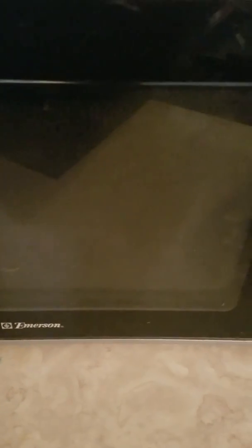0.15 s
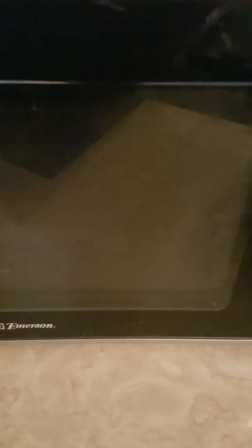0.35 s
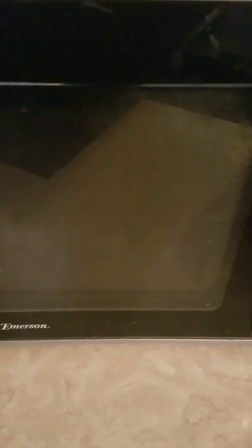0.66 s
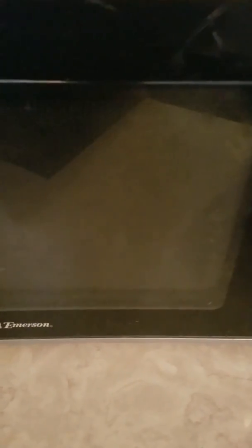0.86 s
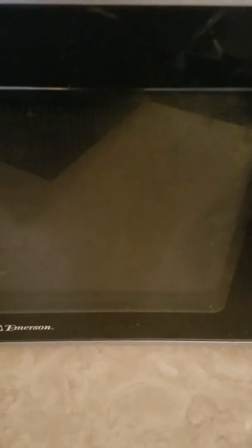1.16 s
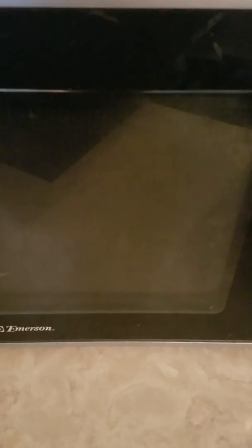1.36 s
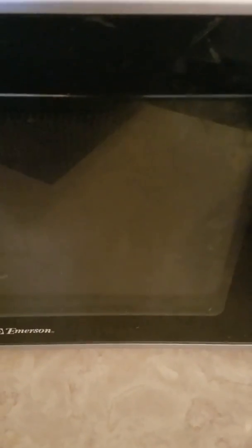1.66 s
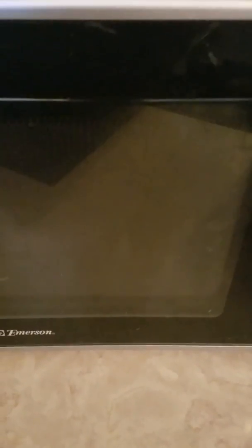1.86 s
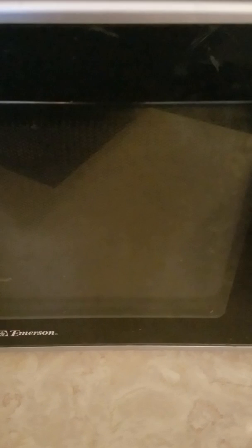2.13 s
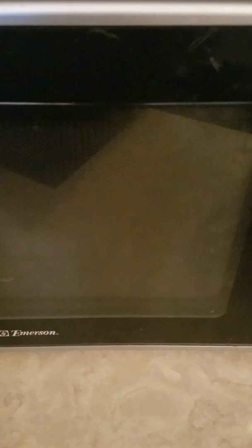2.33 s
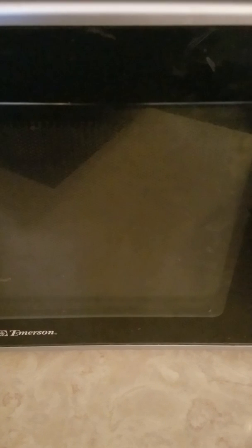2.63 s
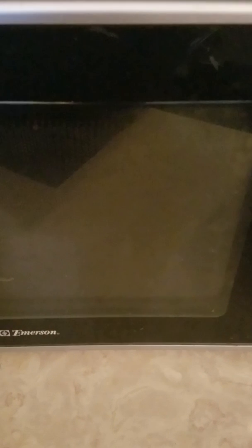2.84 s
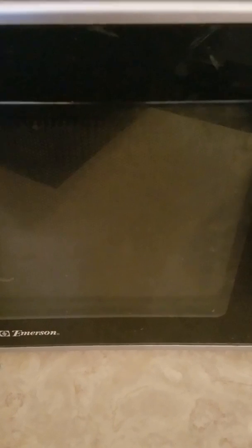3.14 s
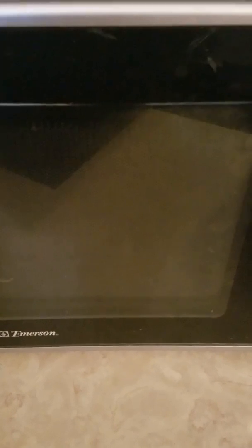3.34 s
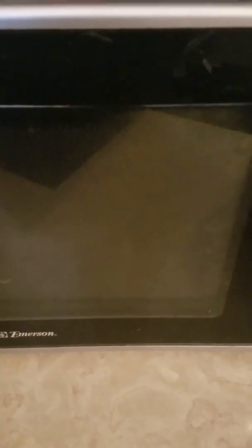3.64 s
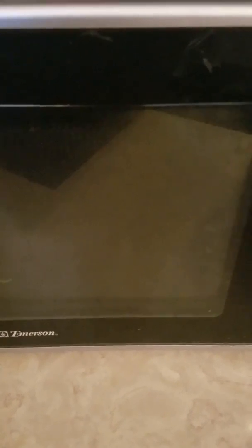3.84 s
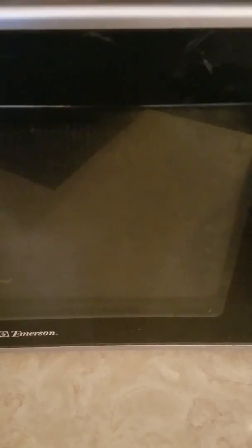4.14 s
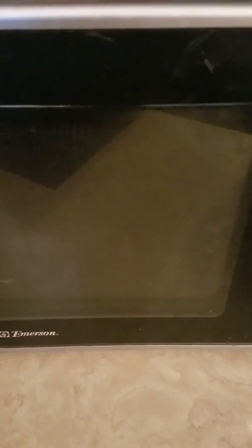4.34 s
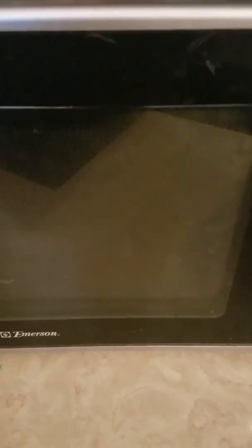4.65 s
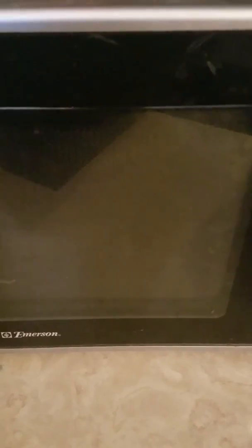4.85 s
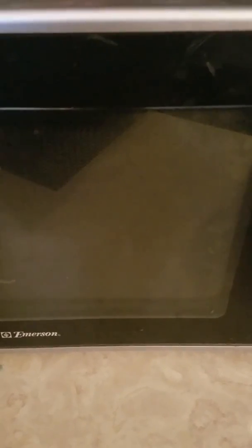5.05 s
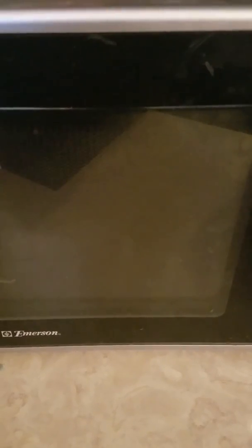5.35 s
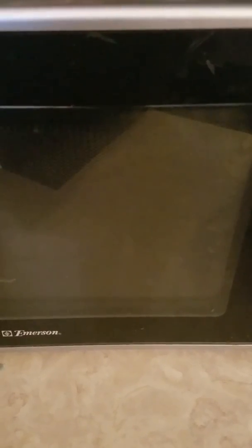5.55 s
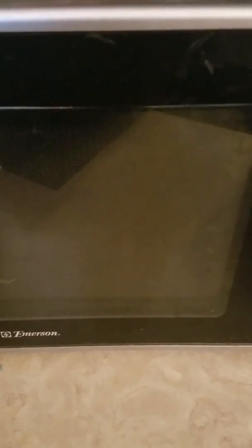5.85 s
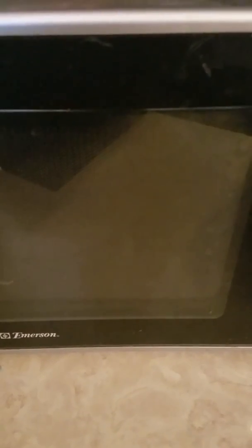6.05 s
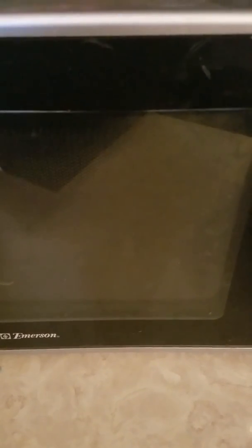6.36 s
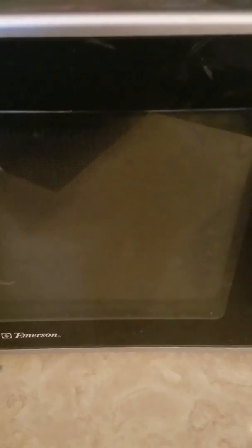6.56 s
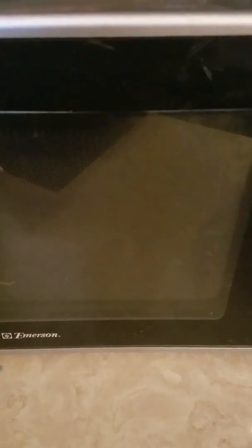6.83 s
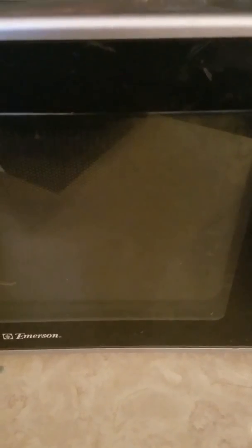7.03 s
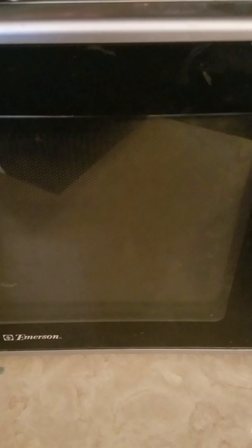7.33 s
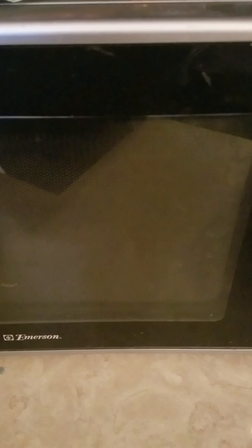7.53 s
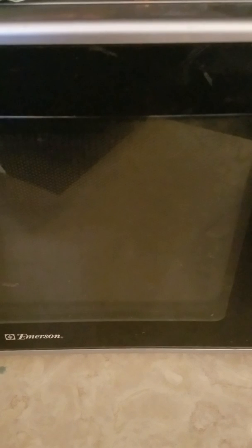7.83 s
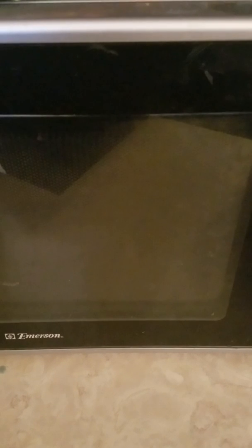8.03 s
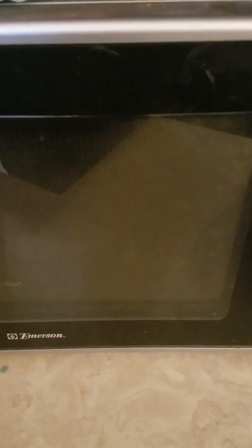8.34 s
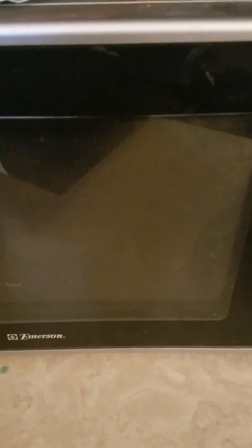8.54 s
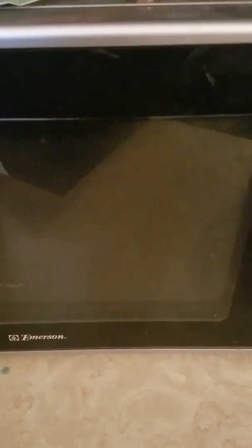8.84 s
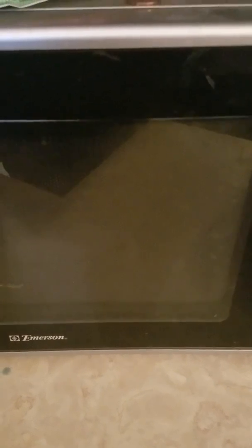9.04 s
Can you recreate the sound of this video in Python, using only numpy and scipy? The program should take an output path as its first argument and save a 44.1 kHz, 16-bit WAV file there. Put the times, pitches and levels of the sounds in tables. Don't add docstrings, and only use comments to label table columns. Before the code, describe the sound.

Close stereo phone pickup of a microwave working on a kitchen counter: continuous mains hum, fan drone and boxy rushing air, with a distant fridge low underneath. One soft knock sounds within the first second, the low end then opens up, a very faint pipe tone passes past the middle, and a sharper knock with a short rattle precedes a quiet fabric rustle. The hum continues to the end.

```python
import sys
import numpy as np
from scipy import signal
from scipy.fft import rfft, irfft, next_fast_len
from scipy.io import wavfile
from scipy.ndimage import uniform_filter1d

SR = 44100
rng = np.random.default_rng(int(sys.argv[2]) if len(sys.argv) > 2 else 0)


def rack_gain(trim_db):
    fader = np.asarray(trim_db, float)
    return 10 ** (fader / 20)


def wrap_up_sound(samples):
    columns = np.atleast_2d(samples).T
    tamed = np.clip(columns, -1, 1)
    steps = np.round(tamed * 32767).astype(np.int16)
    wavfile.write(sys.argv[1], SR, steps)


N = 405279
T = np.arange(N) / SR
M = next_fast_len(N)
HZ = np.arange(M // 2 + 1) * SR / M + 1e-3


def in_time(table):
    s, *columns = np.transpose(table)
    return [np.interp(T, s, c) for c in columns]


def in_pitch(table, hz):
    f, *columns = np.transpose(table)
    return np.array([np.interp(np.log(hz), np.log(f), c) for c in columns])


def walk(rate_hz):
    hold = int(SR / rate_hz)
    steps = np.repeat(rng.standard_normal(N // hold + 1), hold)
    return 1.3 * uniform_filter1d(uniform_filter1d(steps, hold), hold)[:N]


def swell(middle_s, length_s):
    return np.cos(np.pi * np.clip((T - middle_s) / length_s, -.5, .5)) ** 2


def tones(table, angle):
    out = np.zeros((2, N))
    for multiple, left_db, right_db, lead_rad in table:
        left = rack_gain(left_db) * np.cos(multiple * angle)
        right = rack_gain(right_db) * np.cos(multiple * angle - lead_rad)
        out += np.sqrt(2) * np.array([left, right])
    return out


def transformer():
    mains_hz = 59.974
    # mains_multiple, left_db, right_db, left_lead_rad
    hum = [(1, -56, -66, -1.2), (2, -32, -35, -0.7), (3, -51, -50, -0.4), (4, -42, -45, -0.9),
           (5, -54, -59, 0.2), (6, -50, -55, 0.4), (7, -62, -62, -0.2), (8, -65, -68, 0.7),
           (9, -64, -71, -0.5), (10, -61, -69, 0.7), (12, -60, -57, 0.5), (13, -62, -62, -0.0),
           (14, -69, -68, -1.1), (16, -75, -65, 3.0), (18, -73, -72, 0.9), (19, -68, -74, 1.1),
           (23, -68, -76, -1.7), (25, -70, -79, -1.7), (27, -73, -73, -1.1), (28, -66, -78, -1.0),
           (30, -63, -77, -2.3), (32, -68, -70, -2.3), (34, -76, -69, -1.8), (35, -76, -69, 2.2),
           (44, -85, -75, -0.4), (48, -77, -85, 2.9), (59, -76, -90, -1.2), (61, -85, -88, -1.4),
           (65, -78, -83, 2.0), (79, -81, -99, 1.3)]
    # pitch_hz, left_db, right_db
    buzz = [(600, -80, -84), (2000, -82, -84), (3500, -89, -92), (5000, -91, -95), (7000, -97, -101),
            (10000, -101, -104), (12500, -99, -103), (13500, -91, -105), (15800, -91, -99)]
    # time_s, distance_change_mm, treble_db
    hand = [(0, -10, -7), (1, -2, 1), (2.8, -0.5, 2.5), (5, 0.5, 1.5), (7, 4, -1.5), (7.6, -1.5, -9.5),
            (9.19, -18, -4)]
    distance_mm, treble_db = in_time(hand)
    turns = mains_hz * (T - distance_mm / 343000)
    multiples = np.setdiff1d(np.arange(1, 264), np.transpose(hum)[0])
    real, imaginary = rng.standard_normal((2, 2, len(multiples)))
    lines = rack_gain(in_pitch(buzz, multiples * mains_hz)) * (real + 1j * imaginary)
    cycle = np.arange(8193) / 8192
    out = tones(hum, 2 * np.pi * turns)
    for part, gain in ((multiples < 130, 1), (multiples >= 130, rack_gain(treble_db))):
        waves = (lines[:, part] @ np.exp(2j * np.pi * np.outer(multiples[part], cycle))).real
        out += gain * np.array([np.interp(turns % 1, cycle, w) for w in waves])
    return out


def fan():
    # shaft_multiple, left_db, right_db, left_lead_rad
    blades = [(1, -70, -78, -1.2), (3, -46, -49, -.6), (4, -28, -27, -.4), (5, -59, -55, -.1),
              (8, -42.5, -53, -1.6), (12, -61, -65, .4), (16, -58, -60, .7), (20, -60, -65, .9),
              (32, -67, -76, -.3)]
    # time_s, level_db
    draught = [(0, -0.5), (.7, .5), (1.85, 1.5), (2.9, -0.5), (4, -.5), (4.9, .5), (5.4, -1), (6.15, .5),
               (7.2, 0), (7.8, 0.9), (8.3, -0.9), (8.75, 0.9), (9.19, .8)]
    blade_hz, start_turns = 178.275, -2.245
    shortfall_hz, spin_up_s = 4.98, .561
    spin_up = shortfall_hz * spin_up_s * np.exp(-T / spin_up_s)
    hunting = .08 * np.sin(2 * np.pi * .166 * T + 2.0)
    blade_turns = blade_hz * T + start_turns + spin_up + hunting + 0.0092 * walk(12)
    eddies_db = 0.73 * walk(20)
    gusts_db = 0.47 * walk(5)
    level_db = 0.32 + in_time(draught)[0] + eddies_db + gusts_db
    return tones(blades, 2 * np.pi * blade_turns / 4) * rack_gain(level_db)


def air():
    # pitch_hz, left_db_per_hz, right_db_per_hz
    rush = [(20, -93, -94), (45, -73, -86), (100, -64, -68), (162, -61, -59.5), (249, -67.5, -66),
            (450, -74.5, -78.5), (700, -72.5, -75), (996, -77.5, -76.5), (1310, -80.5, -83.5),
            (2190, -81.5, -83.5), (2990, -89.5, -90), (6000, -103, -106), (9500, -111, -115),
            (15700, -105, -110)]
    # pitch_hz, width_hz, left_db, right_db
    cabinet = [(69.5, 8.5, -4, -3), (222, 35, -6, -1), (278, 19, -2, 3), (493, 40, -4, -3),
               (310, 48, 5, 3.5), (342, 20, 5, -1.5), (540, 44, 3.5, 2.5), (648, 60, 4.5, 3),
               (713, 40, 4, 4), (774, 30, 5.5, 6.5), (810, 58, -6, 1.5), (901, 50, 4.5, 4),
               (998, 60, -0.5, 3), (1188, 110, 5.5, -4), (1330, 50, -3, 2.5), (1457, 100, 8.5, 1.5),
               (1600, 60, 1.5, -4.5), (1730, 130, 3, 0.5), (2067, 200, 4, 4), (2350, 60, -3, -1),
               (2570, 120, 1.5, 5.5), (2737, 80, 3, 4.5), (3750, 300, -1.5, -3.5), (4325, 210, 5, 0),
               (4700, 350, 3.5, 2), (5130, 200, 4, 2), (6030, 1100, 2.5, 1), (10200, 1300, 1.5, 2),
               (8000, 1100, 2.5, 4), (12100, 1400, 2, 4.5)]
    # pitch_hz, likeness_0_to_1, left_lead_rad
    ports = [(40, 0.8, -1), (180, 1, -0.8), (258, .65, 0), (322, 0.7, -1.5), (447, .7, 0.62),
             (774, 0.88, 0.5), (826, .5, 1.5), (953, 0.82, 3), (1050, .3, 3.5), (1450, .7, 7),
             (1650, .3, 5), (3000, .35, 5), (6000, 0, 5.5), (16000, 0, 7.5)]
    db = in_pitch(rush, HZ)
    for hz, width_hz, *boost_db in cabinet:
        db = db + np.outer(boost_db, 1 / (1 + (2 * (HZ - hz) / width_hz) ** 4))
    alike, lead_rad = in_pitch(ports, HZ)
    alike = np.clip(alike, 0, 1)
    left, other = rfft(rng.standard_normal((2, M)))
    right = alike * left * np.exp(-1j * lead_rad) + np.sqrt(1 - alike ** 2) * other
    pair = np.array([left, right]) * rack_gain(db) * np.sqrt(SR / 2)
    surge_db = .15 * walk(1.5)
    out = np.zeros((2, N))
    for octave in range(5, 15):
        band = np.clip(1 - abs(np.clip(np.log2(HZ), 5, 14) - octave), 0, 1)
        flicker_db = .6 * walk(6) + .8 * walk(40)
        depth = 1 if octave < 12 else .6
        out += irfft(pair * band, M)[:, :N] * rack_gain(surge_db + flicker_db * depth)
    return out


def knocks():
    # start_s, peak_db, boom_db, rattle_s, body_db
    blows = [
        (.897, -29.5, -38.5, 0.017, -6),
        (7.614, -19, -28.5, .036, 2),
    ]
    # pitch_hz, level_db, t60_s
    panel = [(250, -8, .05), (380, -9.5, 0.11), (520, -6, 0.032), (613, -4.5, 0.041), (712, -2, 0.046),
             (816, -4.5, 0.039), (1053, -4, 0.035), (1200, -5.5, 0.026), (1380, -2.5, .025),
             (1700, -6, 0.02), (2035, -7.5, 0.034), (2305, -9.5, .025), (2690, -10, 0.016),
             (3250, -11, 0.013), (4240, -20, .012)]
    # after_blow_s, over_rattle_db
    bounces = [
        (0, 32),
        (.01, 33.5),
        (.019, 28),
        (.031, 28.5),
    ]
    boom_hz, boom_rise_s, boom_tail_db, boom_t60_s = 102.9, 0.014, -9.5, .8
    room_db, room_t60_s = -0.5, 0.53
    out = np.zeros((2, N))
    s = T[:SR // 2]

    def fade(t60_s):
        return np.exp(-np.log(1000) * s / t60_s)

    thump = 0.43 * (s / boom_rise_s) ** 3 * np.exp(-s / boom_rise_s)
    lingering = rack_gain(boom_tail_db) * (1 - np.exp(-s / boom_rise_s)) ** 2 * fade(boom_t60_s)
    boom = np.sin(2 * np.pi * boom_hz * s - np.array([[-1.5], [-2.4]])) * rack_gain([[1.7], [-1.7]])
    boom = (thump + lingering) * boom
    for start_s, peak_db, boom_db, rattle_s, body_db in blows:
        ring = np.zeros(len(s))
        for k, (hz, db, t60_s) in enumerate(panel):
            level = rack_gain(db + body_db * (hz < 900))
            ring += (-1) ** k * level * np.sin(2 * np.pi * hz * s) * fade(t60_s)
        ring = np.convolve(ring, np.hanning(10))[:len(s)]
        shared, left, right = rng.standard_normal((3, len(s)))
        noise = 1.2 * shared + np.array([left, right])
        tail = uniform_filter1d(noise[:, ::-1], size=10) * rack_gain(room_db + 6) * fade(room_t60_s)
        force = noise * (s < rattle_s) * fade(.6) + tail
        for late_s, db in bounces:
            force[:, int(late_s * SR)] += rack_gain(db) * (late_s < rattle_s)
        heard = signal.fftconvolve(force, ring[None])[:, :len(s)]
        i = int(start_s * SR)
        out[:, i:i + len(s)] += rack_gain(peak_db) * heard / abs(heard).max() + rack_gain(boom_db + 11.5) * boom
    return out


def rustle():
    # middle_s, length_s, level_db
    strokes = [
        (8.133, 0.24, -61),
        (8.28, .2, -67),
    ]
    grains = rng.standard_normal((2, N)) * rack_gain(1.5 * walk(150))
    band = signal.sosfilt(signal.butter(3, [1900, 5000], "band", fs=SR, output="sos"), grains)
    return band * sum(rack_gain(db + 11.5) * swell(middle_s, length_s) for middle_s, length_s, db in strokes)


def pipe():
    # middle_s, length_s, pitch_hz, level_db
    sung = [
        (5.623, 0.45, 528, -51),
        (5.86, .22, 506, -56),
    ]
    notes = np.zeros(N)
    for middle_s, length_s, hz, db in sung:
        notes += rack_gain(db) * swell(middle_s, length_s) * np.sin(2 * np.pi * hz * T)
    return np.sqrt(2) * notes * rack_gain([[-1.0], [1.0]])


def fridge():
    # pitch_hz, left_db, right_db, left_lead_rad
    compressor = [(59.0, -59, -68, -1.2), (92.6, -63, -68, -1.0)]
    return tones(compressor, 2 * np.pi * T)


def scene():
    return transformer() + fan() + fridge() + pipe() + air() + knocks() + rustle()


def top_cut(x):
    return signal.sosfilt(signal.butter(12, 15900, fs=SR, output="sos"), x)


def record(dry):
    # pitch_hz, share_0_to_1
    wind_share = [(20, 1), (190, 0.97), (240, 0.74), (300, 0.41), (360, 0.11), (470, 0)]
    wind_cut_db, opens_s, release_s = -12.5, 1.95, 0.7
    dry = dry * np.clip((T[-1] - T) / .006, 0, 1) - 6e-4
    spectrum = rfft(dry, M) * (HZ < 15765)
    cut_db = wind_cut_db * np.clip(1 - (T - opens_s) / release_s, 0, 1) ** 2
    bass = irfft(spectrum * np.clip(in_pitch(wind_share, HZ)[0], 0, 1), M)[:, :N]
    mix = irfft(spectrum, M)[:, :N] - (1 - rack_gain(cut_db)) * bass
    return top_cut(mix)


dry = scene()
out = record(dry)
wrap_up_sound(out)
```